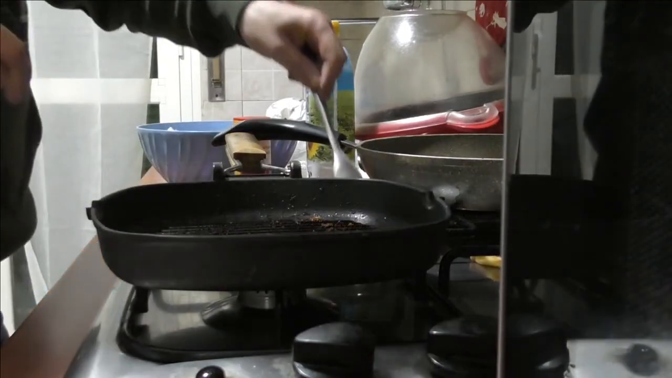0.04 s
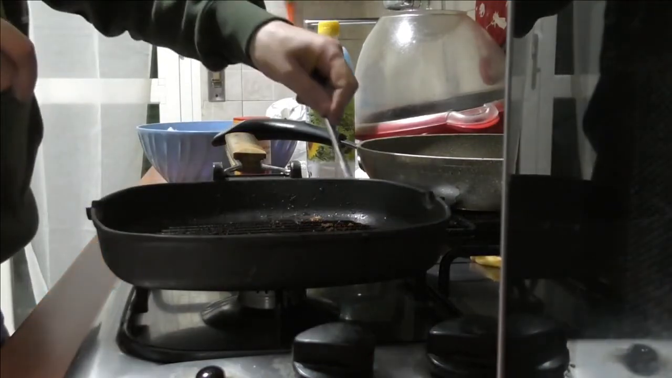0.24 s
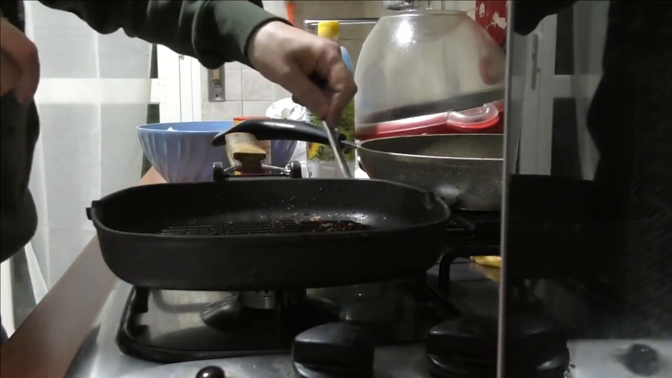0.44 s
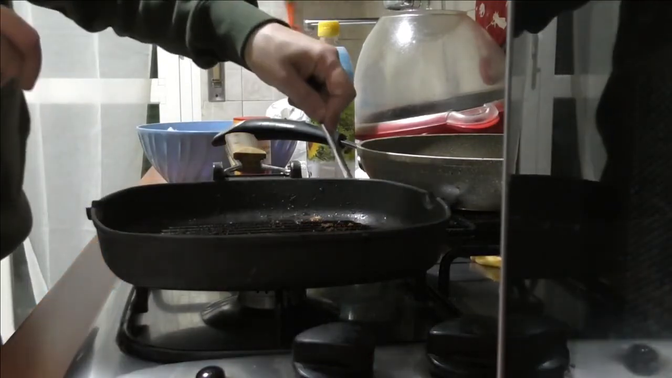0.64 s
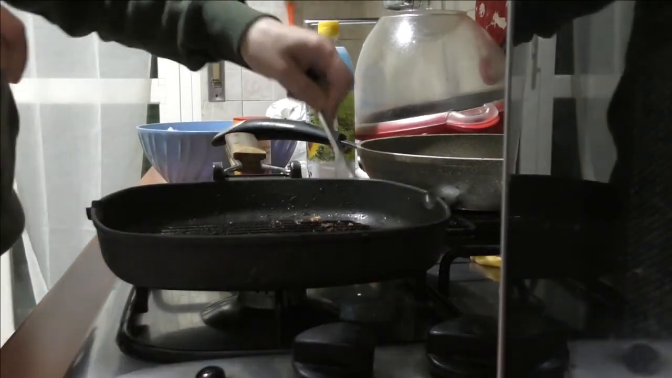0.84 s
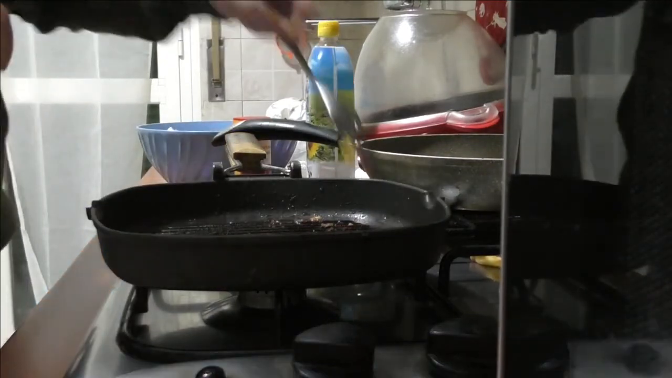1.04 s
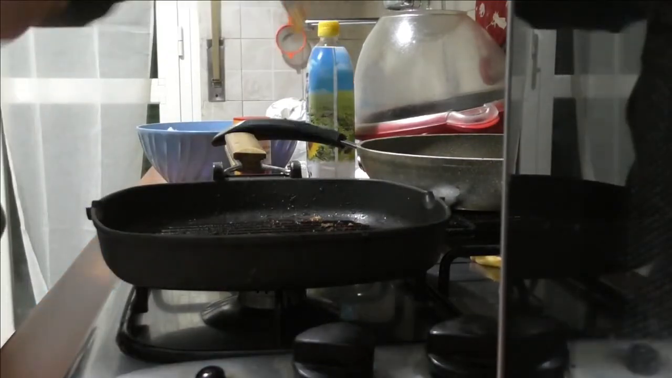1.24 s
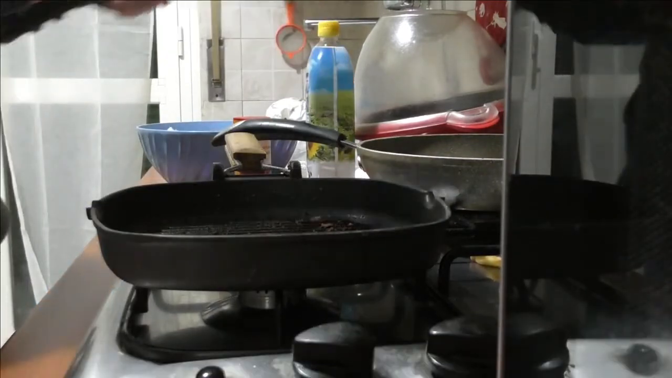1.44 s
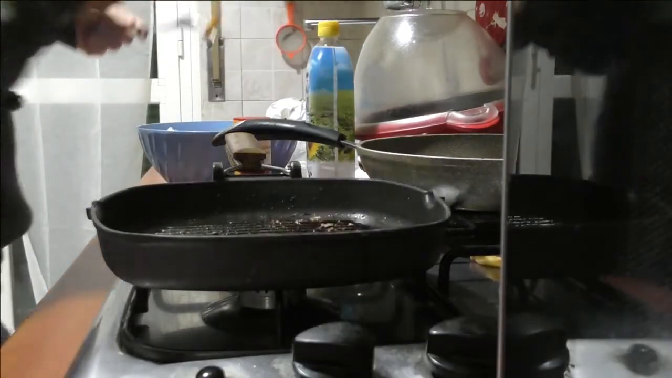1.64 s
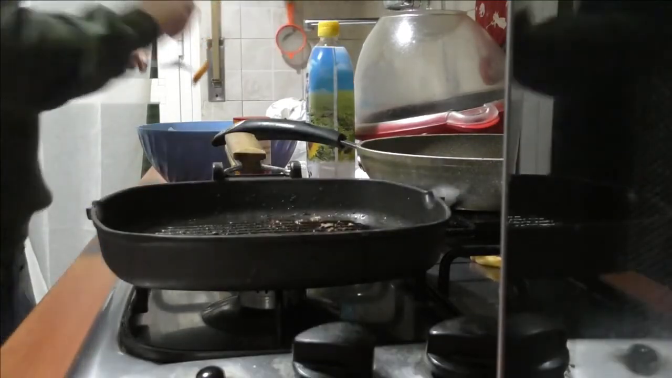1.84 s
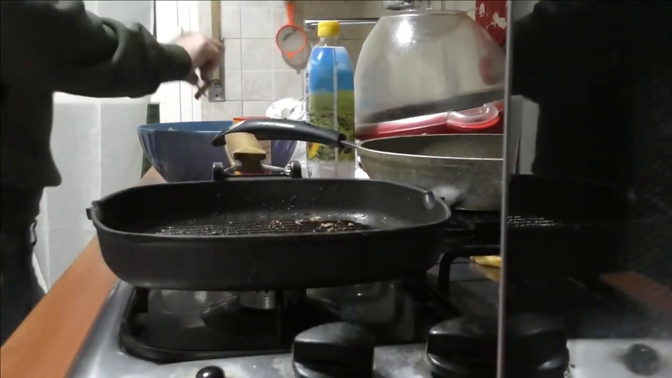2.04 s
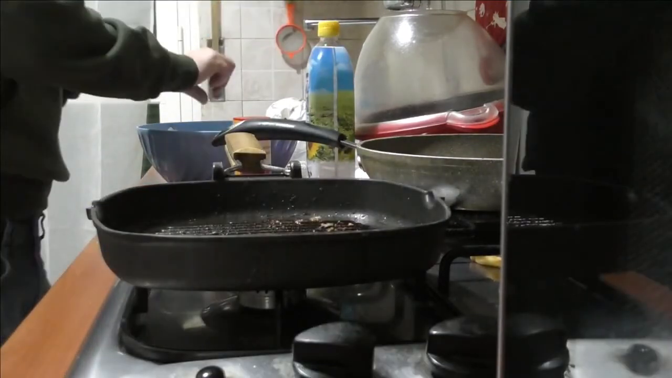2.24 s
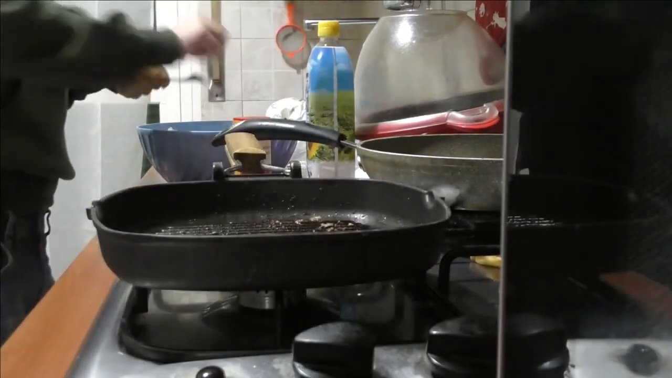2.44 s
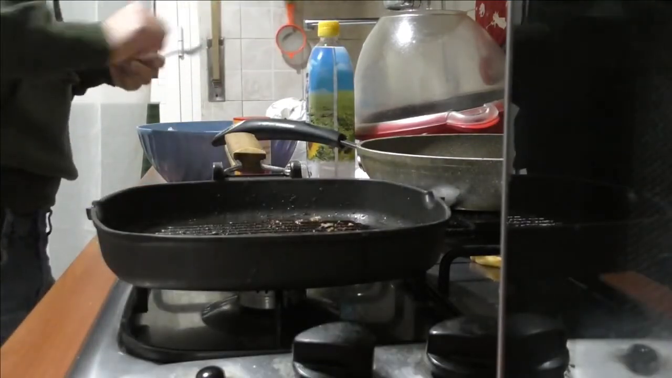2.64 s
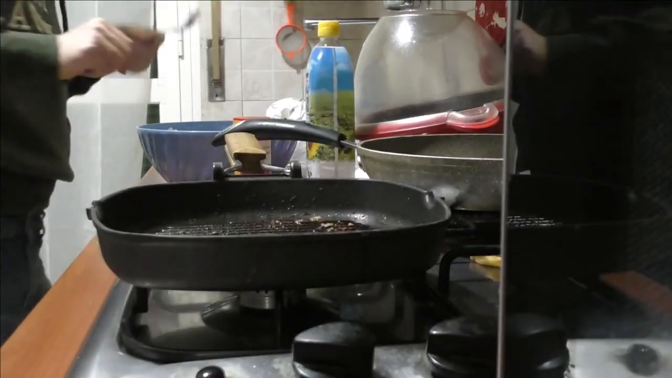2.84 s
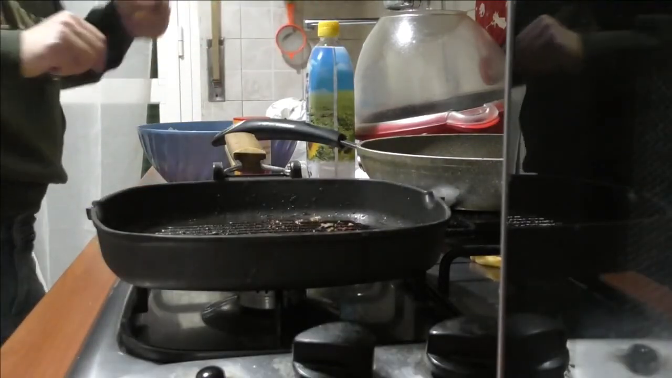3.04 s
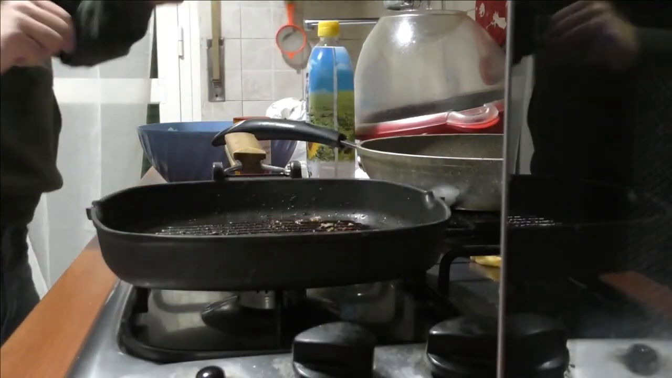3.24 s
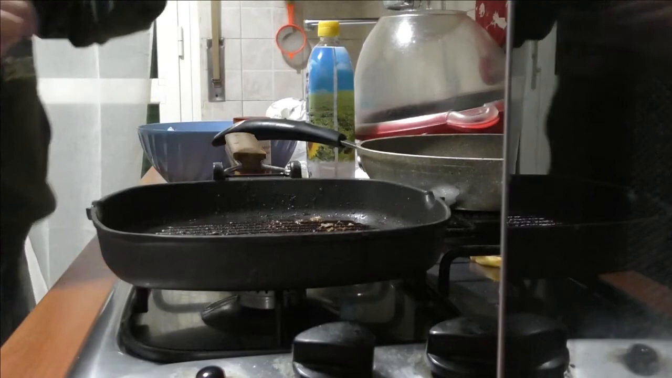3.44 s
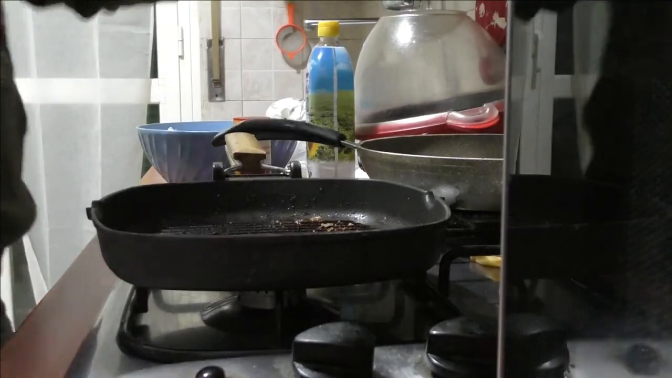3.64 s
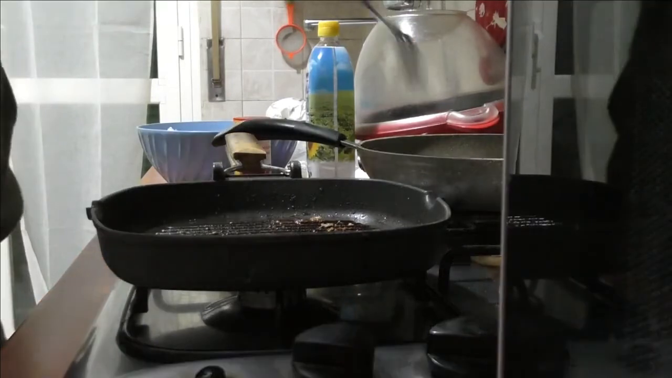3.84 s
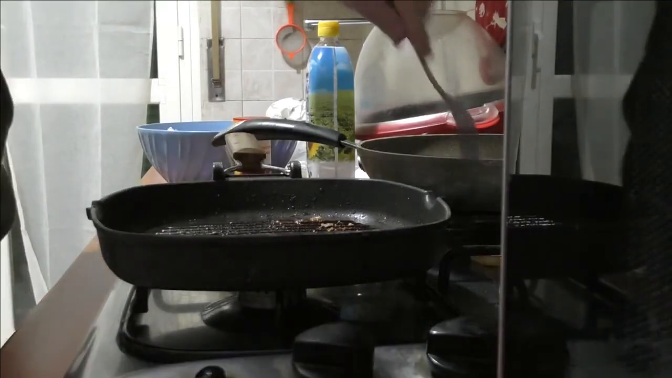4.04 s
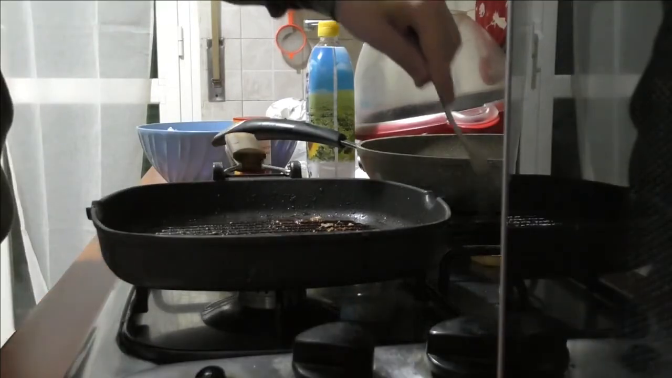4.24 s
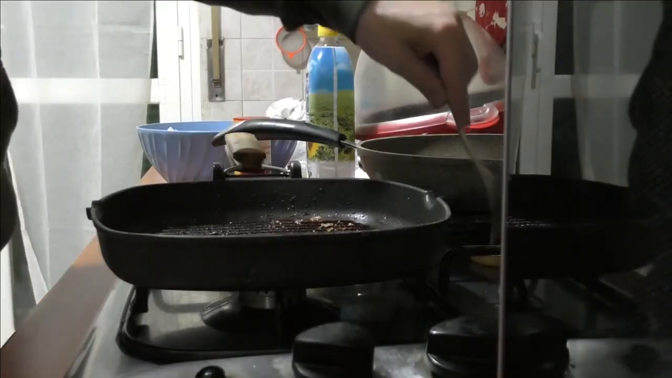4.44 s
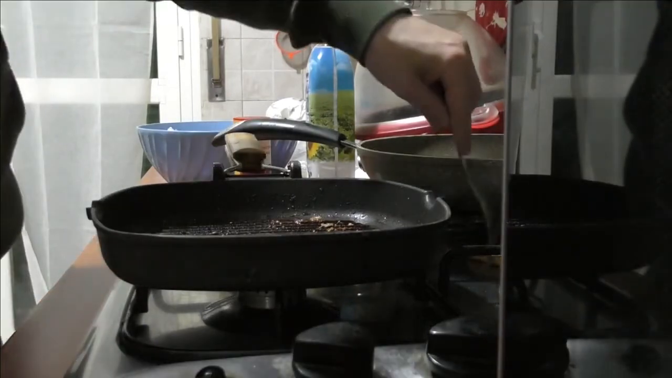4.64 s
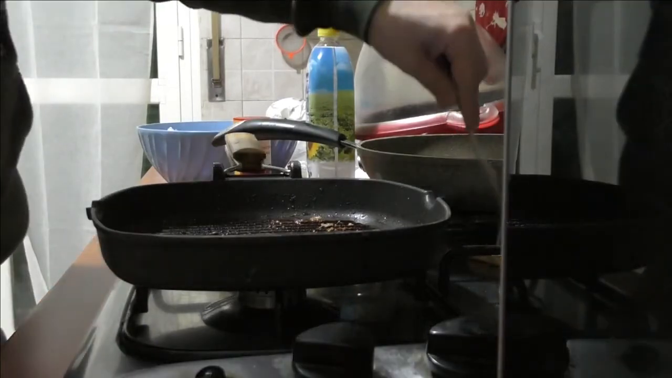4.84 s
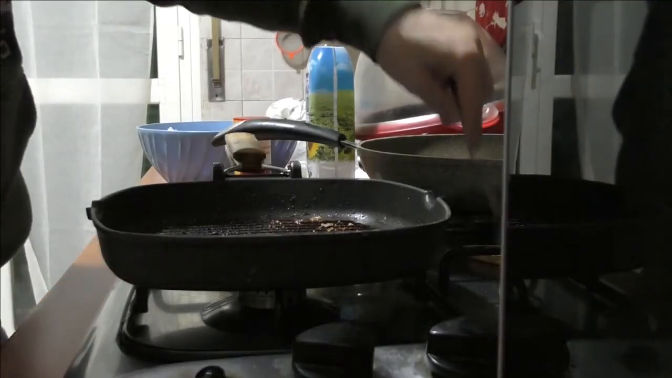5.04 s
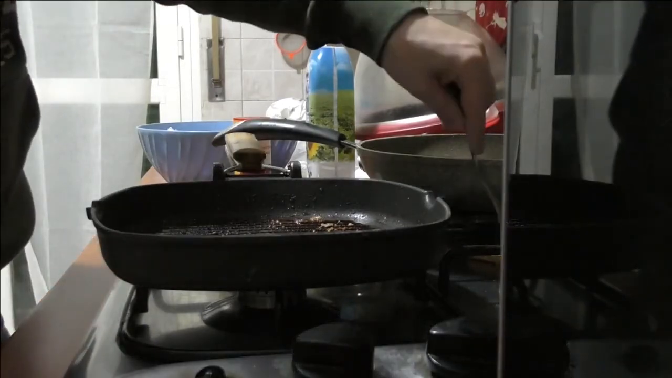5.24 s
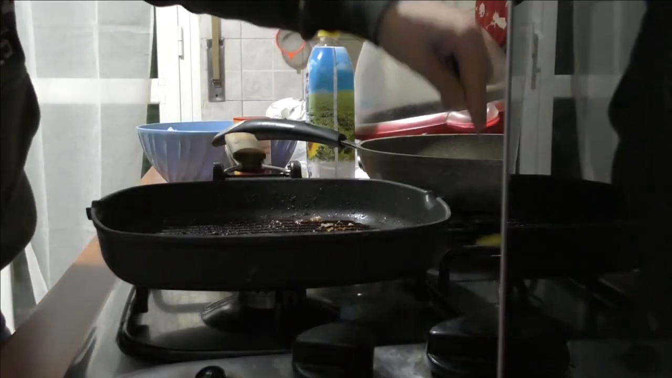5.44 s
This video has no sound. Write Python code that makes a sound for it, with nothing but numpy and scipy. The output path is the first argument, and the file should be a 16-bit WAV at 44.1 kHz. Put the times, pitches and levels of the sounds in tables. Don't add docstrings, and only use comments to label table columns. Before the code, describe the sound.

In a quiet tiled kitchen a metal utensil gives soft bumps and clacks on pan and stove, then light rasping scrapes with dull thuds. A stronger scrape comes past the middle, and late on two hard knocks ring a steel pot, half a second apart. A clock ticks faintly each second over room hush. Close small stereo recorder.

```python
import sys
import numpy as np
from scipy import signal
from scipy.fft import rfft, irfft
from scipy.io import wavfile
from scipy.ndimage import uniform_filter1d

SR = 44100
rng = np.random.default_rng(int(sys.argv[2]) if len(sys.argv) > 2 else 0)


def store_pcm(level_fs):
    pcm = np.round(np.clip(level_fs, -1, 1) * 32767).astype(np.int16)
    wavfile.write(sys.argv[1], SR, np.atleast_2d(pcm).T)


def rack_gain(trim_db):
    fader = np.asarray(trim_db, float)
    return 10 ** (fader / 20)


N = 242837

# (frequency [Hz], level [dB], time to die 60 dB [s])
BOOM_MODES = [(60.5, -37, 0.25), (101.4, 18, 0.496), (139, -5.5, 0.3)]


def evened(x):
    return x / np.sqrt(np.mean(x ** 2) + 1e-20)


def peaked(x):
    return x / abs(x).max()


def levelled(x):
    spectrum = rfft(x)
    power = uniform_filter1d(abs(spectrum) ** 2, size=41)
    return irfft(spectrum / np.sqrt(power + 1e-12), len(x))[:len(x) // 2]


def read(points, hz):
    f, value = np.transpose(points)
    return np.interp(np.log(hz + 1), np.log(f + 1), value)


def add(mix, s, sound):
    part = mix[round(s * SR):][:len(sound)]
    part += sound[:len(part)]


def colour(x, points):
    level_db = np.maximum(read(points, abs(np.fft.fftfreq(4096, 1 / SR))), -90)
    log_gain = np.log(rack_gain(level_db))
    taps = np.fft.ifft(np.exp(np.conj(signal.hilbert(log_gain)))).real[:2048]
    return signal.oaconvolve(x, taps)[:len(x)]


def resonate(x, hz, width):
    turn = np.exp(2j * np.pi * np.cumsum(hz * np.ones(len(x))) / SR)
    r = np.exp(-np.pi * width / SR)
    return 2 * (turn * signal.lfilter([1 - r], [1, -r], x / turn)).real


def ring(modes, count):
    t = np.arange(count) / SR
    return sum(rack_gain(db - 60 * t / t60) * np.sin(2 * np.pi * hz * t) for hz, db, t60 in modes)


def grit(count, per_s, spread_db):
    draw = rng.random((count, 3))
    size = rack_gain(-spread_db * np.log(draw[:, 0] + 0.008)) * np.sign(draw[:, 1] - 0.5)
    return size * (draw[:, 2] < per_s / SR)


def clump(length, rise, spread_db):
    t = np.arange(9000) / SR
    return grit(len(t), 9000, spread_db) * np.exp(-t / length) * np.minimum(t / rise, 1)


def slopes(t, start, held, rise, fall):
    before, after = (start - t) / rise, (t - start - held) / fall
    return -30 * np.maximum(np.maximum(before, after), 0)


def swells(t, rows, under_db):
    humps = sum(rack_gain(2 * db) * np.cos(np.pi / 2 * np.clip((t - s) / half, -1, 1)) ** 2
                for s, half, db in rows)
    return 10 * np.log10(rack_gain(2 * under_db) + humps)


def blows():
    # (time [s], peak level [dB], rattle length [s], pot ring level [dB], stove boom level [dB])
    strikes = [
        (4.646, -6.5, 0.011, -18, -35),
        (5.082, -6.5, 0.013, -16, -30.5),
    ]
    # (frequency [Hz], level per Hz [dB])
    crack_colours = [
        [(35, -33), (60, -12), (287, 2.5), (1040, 2), (1310, -2.5), (1620, 0.5), (1950, 0.5), (2190, 0.5),
         (2650, 1), (3500, -0.5), (4860, -12), (10800, -4), (14900, -11.5), (16000, -26)],
        [(35, -53), (60, -5), (380, 12), (1380, 2), (1620, 1), (2770, 7.5), (3040, 2.5), (4530, -2.5),
         (5330, -5.5), (6280, 2), (7060, -1), (10800, 0.5), (14600, -8), (16000, -19)],
    ]
    # (frequency [Hz], level [dB], time to die 60 dB [s])
    pot_modes = [(271, -7, 0.4), (436.7, 6.5, 0.294), (1162.6, 4.5, .15), (1480, 2, .15), (1962, 3.5, 0.17),
                 (2760, -7, .13), (2700, -17, .13), (3230, -13, .15), (4500, 2, 0.113), (6790, 1, 0.166),
                 (8600, 10, 0.053)]
    skew_colour = [(500, -18.0), (1200, 1.5), (6000, -14.0), (13000, -8.0)]  # (frequency [Hz], level [dB])
    out = np.zeros((2, N))
    for (s, db, length, ring_db, boom_db), crack_colour in zip(strikes, crack_colours):
        held = np.exp(-(np.arange(9000) / SR / length) ** 2)
        rattle = levelled(held * clump(2 * length, 0.00018, 2.1))
        crack = peaked(colour(rattle, crack_colour))
        skew = peaked(colour(clump(length, 0.00017, 1.5), skew_colour))
        direct, side, rung = np.zeros((3, N))
        add(direct, s, crack)
        add(direct, s, rack_gain(boom_db) * peaked(ring(BOOM_MODES, count=20000)))
        add(side, s, rack_gain(-17) * skew)
        add(rung, s, rack_gain(ring_db) * peaked(ring(pot_modes, count=20000)))
        snap = colour(signal.unit_impulse(N, round(s * SR)), crack_colour)
        snap = snap * np.linalg.norm(crack) / np.linalg.norm(snap)
        out += rack_gain(db + 2) * (direct + rung + [side, -side] + walls(snap + rung))
    return out


def bumps():
    # (time [s], peak level [dB], main ring [Hz], deep boom over it [dB], length [s])
    thuds = [(0.206, -33.5, 139, -11, 0.0083), (0.217, -31.5, 338.3, -14, 0.0119),
             (0.258, -36.5, 120, -16, 0.0111), (0.588, -37.5, 292, -24, 0.0086),
             (0.615, -28, 322, -9.5, 0.012), (0.645, -31, 381, -34, 0.0137),
             (0.839, -47.5, 210, -7.5, 0.0095), (0.975, -48, 500, -20, 0.0064),
             (1.576, -35.5, 498, -26, 0.012), (1.662, -44.5, 266, -8.5, 0.02),
             (1.74, -31.5, 266, -32, 0.0051), (1.76, -40, 370, -33.5, 0.037),
             (1.944, -39.5, 305, -33, 0.043), (2.044, -37, 383, -28, 0.0123), (2.233, -39, 177, -24, 0.012),
             (3.402, -42, 179, -7.5, 0.016), (3.492, -37.5, 293.7, -33, 0.0226),
             (3.76, -35, 482, -22, 0.016), (4.608, -31, 372, -10.5, 0.052),
             (5.039, -29.5, 148, -16.5, 0.012), (5.049, -27.5, 256, -5, 0.0162),
             (5.439, -55, 307, -12, 0.013)]
    # (time [s], peak level [dB], main ring [Hz], bright tick over it [dB])
    taps = [(0.212, -35.5, 1470, 5), (0.225, -35.5, 1453, -18.5), (0.381, -53, 1666, -1),
            (0.603, -32.5, 1540, -43), (0.615, -25.5, 1601, -27), (0.624, -26.5, 905, -40),
            (0.789, -47, 1697, -13), (.845, -46, 1300, -25), (0.91, -52, 1790, -9), (1.04, -56, 2500, -3),
            (2.046, -45.5, 2360, -21), (2.224, -35, 1177, -0.5), (2.408, -48.5, 1530, 0),
            (3.405, -46.5, 1200, -26), (3.578, -41, 2680, -14), (4.215, -66, 1640, 14.5),
            (4.505, -47, 1480, -8.5), (4.604, -31.5, 980, -17), (4.872, -47.5, 1090, -14),
            (5.042, -31, 1100, -25), (5.046, -33.5, 1380, -8), (5.272, -37.5, 1110, -5)]
    # (time [s], peak level [dB], main ring [Hz], bright tick over it
    # [dB])
    more_taps = [
        (0.204, -47, 1500, 3),
        (4.594, -51.5, 1670, 6),
        (4.62, -32.5, 2030, -24),
    ]
    # (frequency [Hz], level [dB], time to die 60 dB [s])
    stove_modes = [(210, -0.5, 0.179), (306, 9.5, 0.1), (441.8, 1, 0.152), (700, 5.5, .06)]
    # (frequency [Hz], level [dB], time to die 60 dB [s])
    pan_modes = [(703, -4.5, 0.041), (905, -2, 0.085), (958, -2.5, 0.069), (1270, -3.5, 0.072),
                 (1347, -1.5, 0.079), (1590, -1.5, 0.038), (1734, -2.5, 0.114), (1965, -8, 0.041),
                 (2740, -11.5, 0.057)]
    # (frequency [Hz], level [dB])
    clatter_colour = [(600, -24.5), (900, 8.5), (2000, 1.5), (3200, -4.5), (4500, -17.5), (6000, -16.5)]
    tick_colour = [(3000, 3), (4500, 0), (8000, 2.0), (11500, 9.0), (15500, -6)]
    clack_s = 0.0076
    soft, clacks, spots = np.zeros((3, N))
    for s, db, hz, boom_db, length in thuds:
        contacts = clump(length, 0.0037, 3.25)
        body = peaked(signal.oaconvolve(contacts, ring(stove_modes, count=14000))[:14000])
        boom = peaked(signal.oaconvolve(contacts, ring(BOOM_MODES, count=14000))[:14000])
        spot = peaked(resonate(resonate(contacts, hz, 103.4), hz, 232))
        add(soft, s, rack_gain(db - 4.0) * (0.39 * body + rack_gain(boom_db) * boom))
        add(soft, s, rack_gain(db - 4.5) * spot)
    for s, db, hz, tick_db in taps + more_taps:
        contacts = clump(clack_s, 0.23 * clack_s, 1.55)
        pan_share = 0.35 - 0.014 * tick_db
        body = peaked(signal.oaconvolve(contacts, ring(pan_modes, count=9000))[:9000])
        clack = pan_share * body + peaked(colour(contacts, clatter_colour))
        tick = peaked(colour(contacts, tick_colour))
        add(spots, s, rack_gain(db - 6) * peaked(resonate(contacts, hz, 130)))
        add(clacks, s, rack_gain(db - 1.5) * (peaked(clack) + rack_gain(tick_db + 2) * tick))
    return soft, clacks, spots


def scrapes():
    # (hardest moment [s], rasp level [dB], time to die 30 dB [s],
    # rasp centre [Hz], hiss over the rasp [dB])
    strokes = [(1.726, -47.5, 0.5451, 2010, -8), (1.85, -44, 0.1515, 3000, -3),
               (2.042, -42.5, 0.37, 2250, -4.5), (2.115, -56.5, .4, 2186, -5), (2.178, -51, 0.2, 2940, -2),
               (2.228, -49.5, 0.33, 1730, -6), (3.425, -52.5, 0.75, 1800, -6),
               (3.477, -48, 0.3826, 1600, -5), (3.575, -44, 0.05, 2800, 0.5), (3.645, -53, 0.04, 2200, -19),
               (3.72, -59, 0.1, 1000, -30), (3.78, -30.5, 0.1061, 2120, -13.5),
               (3.815, -33.5, 0.2844, 1980, -7.5)]
    # (start [s], held [s], rumble level [dB])
    drags = [
        (1.76, 0.023, -50),
        (1.95, 0.12, -44.5),
        (2.1, 0.17, -45.5),
        (3.42, 0.28, -58.5),
        (3.76, .18, -46.5),
    ]
    # (frequency [Hz], level per Hz [dB])
    rasp_colour = [(410, -19.5), (700, -10), (838, -12), (1170, -3.5), (1460, -5), (2620, -4.5), (2850, -5),
                   (4040, -7), (6000, -15.5), (7800, -28), (13200, -120)]
    # (frequency [Hz], level per Hz [dB])
    hiss_colour = [(2650, -28), (4500, -3.5), (7100, -12), (10100, -11.5), (14200, -24.5), (16100, -36.5),
                   (16500, -53)]
    # (frequency [Hz], width [Hz], level [dB])
    rumble_modes = [(304.6, 21, -2), (360.46, 24, 1.5), (432, 35, 2.5), (496, 35, 0)]
    stroke_rise_s, drag_rise_s, drag_fall_s = 0.076, 0.08, 0.099
    out, t = np.zeros(N), np.arange(N) / SR
    fine, coarse = grit(N, 14000, 3.0), grit(N, 3000, 2.5)
    wide, hiss = evened(colour(fine, rasp_colour)), evened(colour(fine, hiss_colour))
    for s, db, fall, hz, hiss_db in strokes:
        near = slice(round((s - 0.2) * SR), round((s + 0.7) * SR))
        shape_db = slopes(t[near], s, 0, stroke_rise_s, fall)
        focus = np.minimum(0.38 * rack_gain(0.5 * (db + shape_db + 43.5)), 1.6)
        narrow = evened(resonate(resonate(fine[near], hz, 800), hz, 800))
        rasp = (wide[near] + focus * narrow) / np.hypot(1, focus)
        airy_db = hiss_db + np.where(t[near] > s, 0.85, 1.6) * shape_db
        add(out, near.start / SR, rack_gain(db - 4.0) * (rack_gain(shape_db) * rasp + rack_gain(airy_db) * hiss[near]))
    rumble = sum(rack_gain(db) * resonate(resonate(coarse, hz, 3 * width), hz, width) / np.sqrt(width)
                 for hz, width, db in rumble_modes)
    weight = sum(rack_gain(db - 4.5 + slopes(t, s, held, drag_rise_s, drag_fall_s)) for s, held, db in drags)
    return out + weight * evened(rumble)


def clock():
    # (time [s], peak level [dB])
    ticks = [(0.4749, -48), (1.4647, -46), (2.4724, -47), (3.4719, -49), (4.4722, -49), (5.4571, -47.5)]
    # (frequency [Hz], width [Hz], level [dB])
    case_modes = [(1050, 205, -2.5), (1429, 570, 10.5), (2020, 150, -9), (4140, 1300, 3), (6730, 550, -1),
                  (8100, 1000, 4), (9540, 470, -1), (10900, 500, -1.5), (12000, 900, -19)]
    out = np.zeros(N)
    for s, db in ticks:
        for hz, width, level_db in case_modes:
            lead_s = 0.016 if hz < 3000 else 0.004
            rattle = evened(resonate(clump(0.0313, 0.013, 1.42), hz, width)) / 20
            add(out, s - lead_s, rack_gain(db + 5.5 + level_db) * rattle)
    return out


def cricket():
    # (start [s], end [s], level [dB])
    spells = [
        (.07, .31, -55),
        (.83, 1.39, -54),
        (1.55, 1.63, -50.5),
        (2.51, 2.79, -55),
    ]
    accents_db = [-10.5, -2.5, -1, -5, 0]
    wing_hz, beat_start_s, beat_s = 2529.7, 0.0125, 0.04
    out, t = np.zeros(N), np.arange(900) / SR
    tone = np.sin(2 * np.pi * wing_hz * t * (1 - 1.34 * t))
    pulse = tone * (t / 0.00362) * np.exp(1 - t / 0.0041)
    for k, s in enumerate(np.arange(beat_start_s, N / SR, beat_s)):
        for start, end, db in spells:
            if start < s < end:
                add(out, s, rack_gain(db + accents_db[k % len(accents_db)] - 4.0) * pulse)
    return out


def hush():
    # (middle [s], half length [s], level [dB])
    stirs = [(0.72, 0.31, -56.5), (1.22, 0.45, -61.5), (1.793, 0.37, -52.5), (2.13, 0.249, -51),
             (2.507, 0.41, -56), (3.5, 0.209, -53), (3.859, 0.29, -48), (4.694, 0.17, -51.5),
             (5.203, 0.19, -47.5)]
    # (middle [s], level [dB])
    drone_swells = [(.28, -65.5), (.66, -61), (1.42, -67.5), (2.05, -79), (3.58, -71), (4.1, -68),
                    (4.45, -67), (4.72, -60.5), (5.2, -69)]
    # (frequency [Hz], level per Hz [dB])
    hush_colour = [(71, -28), (120, -13.5), (151, -5), (247, -5.5), (285, -3), (388, -10), (422, -6),
                   (563, -20.5), (1160, -9), (1280, -10), (2190, -12.5), (2480, -14), (6530, -26.5),
                   (14900, -22.5), (16500, -51)]
    # (frequency [Hz], level per Hz [dB])
    drone_colour = [(25, -30), (40, -6), (50, 4), (60, -0.5), (75, -10.5), (100, -3.5), (125, -4),
                    (170, -26)]
    # (frequency [Hz], correlation [0..1])
    likeness = [(60, 1), (150, 0.26), (380, 0.69), (950, 0.824), (2380, 0.386), (5980, 0.888), (15000, 1)]
    swell_s, drone_db = 0.22, -71.5
    frames, hz = N // 1024 + 5, np.fft.rfftfreq(4096, 1 / SR)
    a, b, c, d, patches = rng.standard_normal((frames, 2049, 5)).T
    patches = evened(uniform_filter1d(uniform_filter1d(patches, 48, 0), 4, 1))
    t = np.arange(frames) * 1024 / SR
    level_db = swells(t, stirs, -57 - 0.5 * t)
    bass_db = swells(t, [(s, swell_s, db) for s, db in drone_swells], drone_db) - level_db
    same = np.clip(read(likeness, hz), -1, 1)[:, None]
    left, other = a + 1j * b, c + 1j * d
    z = np.array([left, same * left + np.sqrt(1 - same ** 2) * other])
    drone = rack_gain(read(drone_colour, hz)[:, None] + 12.5 + bass_db) * (hz[:, None] < 200)
    z *= (rack_gain(read(hush_colour, hz))[:, None] + drone) * rack_gain(0.97 * patches)
    noise = evened(signal.istft(z, nperseg=4096, noverlap=3072)[1][:, :N])
    return noise * rack_gain(np.interp(np.arange(N) / SR, t, level_db))


def walls(x):
    # (frequency [Hz], time to die 60 dB [s])
    decay = [(100, 0.36), (300, 0.5), (1000, 0.529), (3000, 0.41), (8000, 0.34), (14000, 0.2274)]
    # (frequency [Hz], level [dB])
    echo_colour = [(60, -4.5), (250, 4), (600, -7.5), (1200, -0.5), (3000, -0.5), (6000, 0), (14000, -1.5)]
    # (frequency [Hz], side share [ratio])
    side_share = [(100, 0.134), (400, 0.12), (700, 0.36), (1200, 0.49), (2000, 0.39), (4500, 0.566),
                  (8000, 0.044), (13000, 0.076)]
    taps = np.zeros((2, SR))
    grid = np.arange(140, SR - 20, 12)
    at = grid + rng.integers(0, 12, (2, len(grid)))
    np.put_along_axis(taps, at, rng.choice([-1., 1.], at.shape), 1)
    hz, t, z = signal.stft(taps, SR, nperseg=512)
    z = z * rack_gain(read(echo_colour, hz)[:, None] - 60 * t / read(decay, hz)[:, None])
    side = z[1] * read(side_share, hz)[:, None]
    tail = signal.istft(np.array([z[0] + side, z[0] - side]), SR, nperseg=512)[1]
    tail = tail * (np.arange(z.shape[2] * 256 - 256) > 130)
    return signal.fftconvolve(x[None], tail / np.linalg.norm(tail[0]), axes=1)[:, :N]


def scene():
    strokes = scrapes()
    soft, clacks, spots = bumps()
    far, insect = clock(), cricket()
    to_walls = rack_gain(-4.0) * soft + rack_gain(-3.0) * clacks + rack_gain(-10.0) * spots
    to_walls += rack_gain(-2.0) * far + rack_gain(-4.5) * strokes + rack_gain(-14.5) * insect
    direct = rack_gain(-1.5) * soft + clacks + spots + rack_gain(-6.5) * far + strokes + insect
    return blows() + direct + walls(to_walls) + hush()


def top_cut(x):
    return signal.sosfilt(signal.butter(12, 16820, fs=SR, output="sos"), x)


def record(dry):
    power_db = 10 * np.log10(signal.lfilter([0.004], [1, -0.996], (dry ** 2).mean(0)) + 1e-12)
    fall = np.arange(N) * 122.0 / SR
    over_db = np.maximum(np.maximum.accumulate(power_db + fall) - fall + 26.5, 0)
    lag = np.exp(-1 / (SR * 0.01))
    ducked = dry / rack_gain(0.9 * signal.lfilter([1 - lag], [1, -lag], over_db))
    ducked = signal.sosfilt(signal.butter(3, 42, "high", fs=SR, output="sos"), ducked)
    ducked = signal.oaconvolve(ducked, signal.firwin(255, 16400, fs=SR)[None], "same")
    return top_cut(ducked)


dry = scene()
out = record(dry)
store_pcm(out)
```